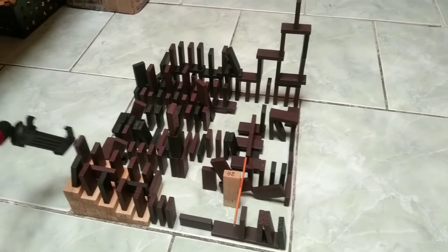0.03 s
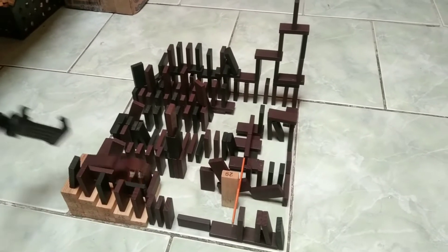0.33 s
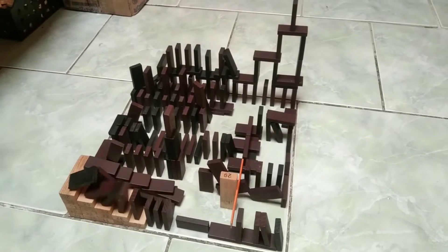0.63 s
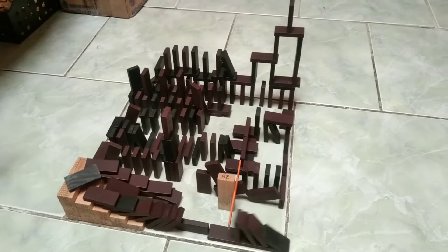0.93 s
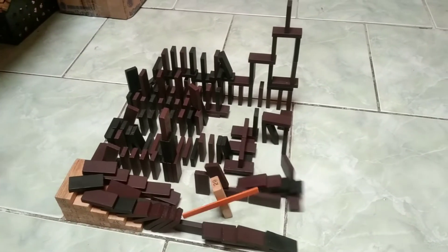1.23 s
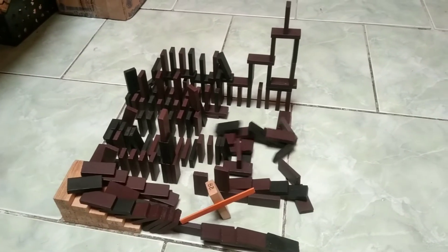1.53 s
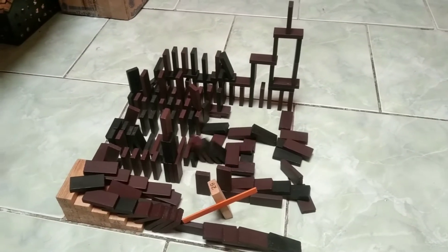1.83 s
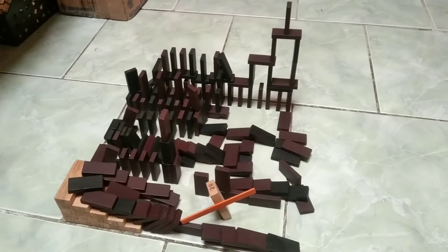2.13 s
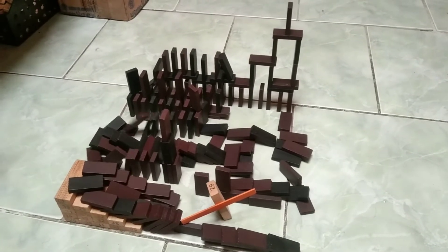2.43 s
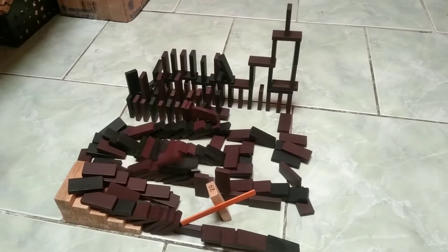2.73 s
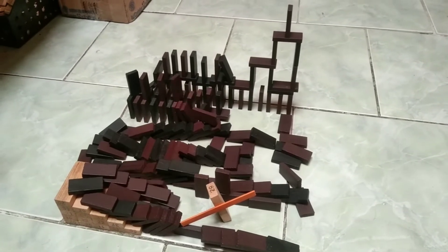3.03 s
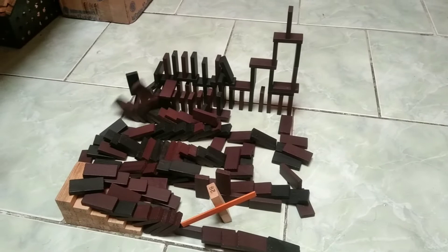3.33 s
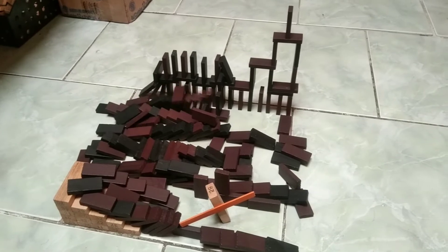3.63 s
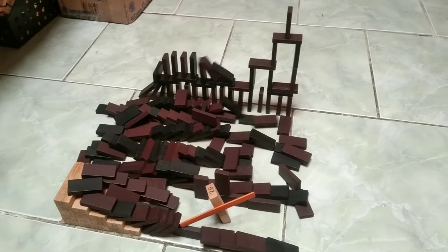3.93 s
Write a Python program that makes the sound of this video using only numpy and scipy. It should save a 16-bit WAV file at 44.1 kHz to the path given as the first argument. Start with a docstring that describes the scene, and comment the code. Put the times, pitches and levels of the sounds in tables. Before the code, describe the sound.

Small hard dominoes fall against one another in irregular clattering bursts, set off by a softly sliding toy. They rattle, clink and knock on wood and tile, pause briefly, then carry on in a slightly echoing room.

```python
"""Dominoes toppling on tile

A toy scrapes up to small, hard dominoes, and they fall in uneven runs. Each collision cracks, rings
briefly on a low and a high note, then chatters as the block settles. Some blocks slap, clink, rattle
or knock on wooden props. It all echoes in a bare room with a faint hum."""
import sys
import numpy as np
from scipy import signal
from scipy.fft import rfft, irfft
from scipy.io import wavfile
from scipy.ndimage import uniform_filter1d, minimum_filter1d

SR = 44100
rng = np.random.default_rng(int(sys.argv[2]) if len(sys.argv) > 2 else 0)


def put_to_file(sound):
    """Save the sound as 16-bit audio at rate SR, in the file named by the first command-line argument."""
    columns = np.atleast_2d(sound).T  # one column per channel
    safe = np.clip(columns, -1, 1)
    whole_steps = np.round(safe * 32767)
    wavfile.write(sys.argv[1], SR, whole_steps.astype(np.int16))


N = 176400

# how loud the sliding toy is: time_s, level_db
SLIDE_LEVELS = [(0, -65), (.05, -66), (.1, -58), (.2, -50), (.42, -55), (.6, -85)]
# tone colour (how strong each frequency is) of the toy's scrape: frequency_hz, level_db
SLIDE_COLOUR = [(500, -42), (2400, -19.5), (4300, -9), (7000, -18.5), (10000, -29), (13000, -42)]
# tone colour of the room's own noise: frequency_hz, level_db
AIR_COLOUR = [(20, -31.5), (55, -8), (95, -0.5), (150, -5.5), (290, -12.5), (440, -9.5), (700, -19.5),
              (8000, -22), (15000, -63.5)]
# one block hits the next: start_s, low_pitch_hz, low_level_db, high_pitch_hz, high_level_db
COLLISIONS = [(0.312, 5030, -41, 6570, -41), (0.4174, 4060, -32.5, 6540, -36),
              (0.4658, 4660, -26, 6630, -26), (0.4963, 2840, -27, 6400, -26.5),
              (0.5277, 4840, -28.5, 6960, -38), (0.5583, 3470, -21.5, 8250, -22),
              (0.568, 3800, -16.5, 8350, -16), (0.5925, 5040, -14, 8690, -6),
              (0.6051, 3560, -18, 8400, -14), (0.6407, 3460, -22, 8550, -10),
              (0.7119, 4020, -22, 7400, -24.5), (0.759, 4750, -37, 7400, -32),
              (0.8097, 3950, -30, 7680, -29), (0.8508, 4780, -26.5, 6530, -25.5),
              (0.8599, 5140, -23, 6540, -19.5), (0.8991, 3270, -23.5, 7460, -14.5),
              (1.0202, 3700, -31.5, 7540, -57), (1.0578, 4540, -35, 6500, -34),
              (1.11, 3750, -31, 8360, -28), (1.169, 4220, -34.5, 8050, -32.5),
              (1.204, 3660, -24.5, 8160, -31.5), (1.241, 3070, -32, 8100, -31.5),
              (1.2727, 4560, -21, 7850, -20), (1.3389, 3680, -25.5, 7770, -28.5),
              (1.3646, 4660, -23, 8840, -17), (1.379, 3720, -25, 8750, -12.5),
              (1.393, 3880, -26.5, 8570, -13), (1.4385, 4540, -23.5, 8860, -23),
              (1.5087, 3360, -29, 7590, -30.5), (1.622, 4150, -37, 7640, -33.5),
              (1.6461, 5500, -23, 8530, -19), (1.69, 4660, -24, 6170, -26),
              (1.7522, 5300, -24.5, 6420, -35), (1.794, 3880, -24.5, 7600, -33),
              (1.8352, 4800, -26, 7460, -24.5), (1.8583, 4930, -18.5, 7800, -12.5),
              (1.879, 4070, -22.5, 7600, -16.5), (1.9248, 5130, -21.5, 8500, -12.5),
              (1.9789, 4970, -33, 8490, -19), (2.0204, 4100, -23.5, 6650, -24),
              (2.0415, 4300, -18.5, 6980, -16.5), (2.057, 4430, -19.5, 7340, -20.5),
              (2.112, 3920, -23, 7550, -35), (2.187, 3880, -28.5, 7700, -33.5),
              (2.3256, 4250, -67, 7680, -42.5), (2.4598, 4300, -35, 7300, -45),
              (2.478, 5100, -30.5, 7120, -38), (2.487, 4500, -29.5, 7070, -32.5),
              (2.5118, 4540, -27.5, 7300, -28.5), (2.621, 5020, -31, 7920, -26),
              (2.7409, 4860, -26, 8920, -20), (2.852, 2840, -30, 7550, -35), (2.8717, 4700, -19, 7900, -13),
              (2.8868, 4670, -13.5, 7400, -7), (2.9053, 4600, -22, 6980, -12.5),
              (2.9523, 4100, -19.5, 7580, -17), (2.958, 4600, -18, 7600, -18.5),
              (3.0051, 4560, -22, 7300, -27), (3.0158, 4340, -18.5, 7380, -13.5),
              (3.066, 3340, -29, 7210, -16.5), (3.1108, 4200, -22.5, 7350, -80),
              (3.12, 4280, -20, 7400, -23), (3.2637, 4350, -24.5, 8950, -37.5),
              (3.3332, 4800, -36, 7400, -32), (3.364, 4050, -20, 7400, -22),
              (3.41, 4230, -31.5, 6940, -20.5), (3.4835, 4220, -16.5, 7760, -6),
              (3.5022, 4939, -16, 7550, -8), (3.5486, 5540, -18, 7100, -14),
              (3.5589, 3820, -19.5, 8200, -14), (3.5959, 4000, -19.5, 7800, -20),
              (3.6357, 4100, -16.5, 7500, -19.5), (3.6901, 4350, -22.5, 7700, -36),
              (3.742, 4343, -30, 7540, -20.5), (3.7673, 4670, -26, 7960, -20),
              (3.7916, 4000, -33, 7880, -16), (3.8468, 4070, -21, 7740, -21),
              (3.9145, 5000, -17.5, 7310, -15.5), (3.9864, 3770, -25, 8000, -20.5)]
# tone colour of a crack's low part: frequency_hz, level_db
LOW_COLOUR = [(200, -61), (1000, -23.5), (2100, -11.5), (2950, 0.5), (4200, 3), (5600, -0.5), (6600, -6.5),
              (9000, -36)]
# tone colour of its high part: frequency_hz, level_db
HIGH_COLOUR = [(3500, -36), (5400, -5), (6300, 0.5), (8400, 2), (10000, -13.5), (12500, -31)]
# tone colour of the thin tick on top: frequency_hz, level_db
TICK_COLOUR = [(8000, -39), (10500, 4), (16000, -10)]
# how loud that tick is next to the high part: time_s, level_db
TICK_LEVELS = [(.55, -26), (1.15, -24), (1.6, -16.5), (2.2, -32), (2.55, -26.5), (3.05, -23), (3.4, -19),
               (4, -23)]
# tone colour of blocks rubbing on tile: frequency_hz, level_db
SCRUB_COLOUR = [(250, -13.5), (1300, 0), (6000, -15)]
# blocks slapping face to face: start_s, level_db
SLAPS = [(.5675, -16), (.577, -18.5), (0.6302, -30), (1.273, -21.5), (1.393, -22), (1.9235, -18),
         (1.979, -18.5), (2.905, -15), (3.0137, -19), (3.119, -25), (3.549, -18), (3.595, -18)]
# knocks on the props and floor: start_s, pitch_hz, level_db
KNOCKS = [(.593, 1520, -33), (.759, 1250, -39), (.901, 1720, -35.5), (1.204, 2308, -37.5),
          (1.242, 2470, -30), (1.273, 960, -46), (1.692, 138, -47.5), (2.885, 1460, -37), (2.887, 480, -50),
          (3.365, 1860, -33.5)]
# blocks bouncing clear: start_s, pitch_hz, level_db
CLINKS = [(.863, 6620, -15.5), (1.379, 3510, -19), (2.112, 7740, -19.5), (2.741, 9200, -26),
          (2.953, 2930, -19), (3.519, 6987, -21)]
# rows of blocks sliding down: start_s, end_s, low_level_db, high_level_db
RATTLES = [(1.549, 1.58, -34, -37.5), (1.86, 1.998, -39.5, -26.5), (2.018, 2.158, -30, -41),
           (2.634, 2.715, -34.5, -31), (3.458, 3.479, -22, -33), (3.522, 3.829, -28.5, -36.5)]
# how long the room's echo takes to fade by 60 dB: frequency_hz, fade_s
ECHO_FADES = [(300, 0.2), (1500, 0.75), (4000, 0.51), (8000, 0.32), (14000, 0.42)]

BLOW_S = 0.0033  # a blow has the energy of a steady sound at its level lasting this long
TOUCH_DETUNE = 0.11  # slaps and rattles stray in pitch by about this share


def amp(db):
    """Turns decibels into a number to multiply by."""
    return 10 ** (np.asarray(db) / 20)


def unit(x):
    """Scales a sound so its energy is 1."""
    return x / np.sqrt(np.sum(x ** 2) + 1e-20)


def read(points, hz):
    """Looks up frequencies in a table, giving each octave equal space."""
    f, value = np.transpose(points)
    return np.interp(np.log(hz + 1), np.log(np.maximum(f, 1)), value)


def add(mix, start_s, sound):
    """Adds a sound to the mix at the given time."""
    part = mix[max(round(start_s * SR), 0):][:len(sound)]
    part += sound[:len(part)]


def noise(colour):
    """Steady noise with the given tone colour and an average power of 1."""
    hz = np.fft.rfftfreq(N, 1 / SR)
    phases = np.exp(2j * np.pi * rng.random(len(hz)))
    return unit(irfft(amp(read(colour, hz)) * phases, N)) * np.sqrt(N)


def toy_slide():
    """The toy scrapes softly as it is pushed up to the first block."""
    level_db = np.interp(np.arange(N) / SR, *np.transpose(SLIDE_LEVELS))
    return noise(SLIDE_COLOUR) * amp(level_db)


def background(air_db=-56, waver_db=1.5, hum_hz=115.5, hum_db=-63):
    """Low room noise that wavers in patches, and a faint hum."""
    spectrum = signal.stft(noise(AIR_COLOUR), nperseg=2048)[2]
    patches = uniform_filter1d(rng.standard_normal(spectrum.shape), size=5, axis=0)
    patches = uniform_filter1d(patches, size=10, axis=1)
    air = signal.istft(spectrum * amp(waver_db * patches / patches.std()))[1][:N]
    hum = np.sqrt(2) * np.sin(2 * np.pi * hum_hz * np.arange(N) / SR)
    return amp(air_db) * air / air.std() + amp(hum_db) * hum


def strike(colour, hz, rise_s, ring_s=0.0027, ring_db=1.5, size=1536):
    """Part of a blow: a sharp crack, a louder noisy body that outlasts it, and each block's main note."""
    crack_s, body_s, body_db = 0.00029, 0.0028, 9  # like ring_s, times to fade to about a third
    max_detune = 0.042  # one block rings a little flat, the other a little sharp
    t = np.maximum(np.arange(size) - 12, 0) / SR
    rise = 1 - np.exp(-(t / rise_s) ** 2)
    fade = np.exp(-t / crack_s) + amp(body_db) * np.exp(-t / body_s)
    burst = rng.standard_normal(size) * rise * fade
    crack = unit(irfft(rfft(burst) * amp(read(colour, np.fft.rfftfreq(size, 1 / SR)))))
    pair = np.zeros(size)
    for side in (-1, 1):
        block_hz = hz * (1 + side * max_detune * rng.random())
        pair += np.sin(2 * np.pi * (block_hz * t + rng.random()))
    ring = unit(pair * rise * np.exp(-t / ring_s))
    return unit(crack + amp(ring_db) * ring) * np.sqrt(BLOW_S * SR)


def clack(start_s, low_hz, low_db, high_hz, high_db, typical_hz=4280, tick_hz=(10430, 14700)):
    """Two blocks meet: a low and a high ring, with a thin tick on top."""
    shift = (low_hz / typical_hz) ** 0.31  # the low crack's colour follows the low note
    low_colour = [(hz * shift, db) for hz, db in LOW_COLOUR]
    rise_s = 0.00015 * amp(-0.39 * max(low_db, high_db))  # weaker blows stay in contact longer
    low = strike(low_colour, low_hz, rise_s, ring_s=0.00051, ring_db=-2)
    high = strike(HIGH_COLOUR, high_hz, rise_s)
    tick = strike(TICK_COLOUR, rng.uniform(*tick_hz), rise_s)
    tick_db = np.interp(start_s, *np.transpose(TICK_LEVELS))
    return amp(low_db) * low + amp(high_db) * (high + amp(tick_db) * tick)


def dominoes(corner_s=0.004, corner_db=-8, bounces=4, chatter_s=0.04, chatter_db=-15.5, spread_db=2.5):
    """Each block hits, lands its second corner just after, then chatters in weaker bounces."""
    out = np.zeros(N)
    for start_s, low_hz, low_db, high_hz, high_db in COLLISIONS:
        blow = (start_s, low_hz, low_db, high_hz, high_db)
        add(out, start_s, clack(*blow))
        add(out, start_s + corner_s * (.5 + rng.random()), amp(corner_db) * clack(*blow))
        for _ in range(bounces):
            low_stray, high_stray, force = rng.standard_normal(3)
            bounce = clack(start_s, low_hz * (1 + 0.145 * low_stray), low_db,
                           high_hz * (1 + 0.0725 * high_stray), high_db)
            gain = amp(chatter_db + spread_db * np.tanh(force))
            add(out, start_s + chatter_s * rng.random(), gain * bounce)
    return out


def scrub(start_s=0.41, end_s=1.7, level_db=-52.5):
    """The nearest blocks rub dully on the tile as they fall."""
    t = np.arange(N) / SR
    moving = 1. * (t > start_s) * (t < end_s)
    return amp(level_db) * noise(SCRUB_COLOUR) * uniform_filter1d(moving, SR // 10)


def slaps(pitch_hz=5820, peak_s=0.000165):
    """Blocks meet flat, making a few vibrations that die at once."""
    out, t = np.zeros(N), np.arange(256) / SR
    for start_s, db in SLAPS:
        hz = pitch_hz * (1 + TOUCH_DETUNE * rng.standard_normal())
        slap = np.sin(2 * np.pi * hz * t) * t * np.exp(-t / peak_s)
        add(out, start_s, amp(db) * unit(slap) * np.sqrt(BLOW_S * SR))
    return out


def taps(rows, ring_s, width, size=4096):
    """Short bursts of noise, each around one pitch; width is a share of that pitch."""
    out, t = np.zeros(N), np.arange(size) / SR
    f = np.fft.rfftfreq(size, 1 / SR)
    for start_s, hz, db in rows:
        resonance = 1 / (1 + (2 * (f / hz - 1) / width) ** 2)
        ring = irfft(resonance * np.exp(2j * np.pi * rng.random(len(f))))
        burst = ring * (1 - np.exp(-t * hz)) * np.exp(-t / (ring_s + .5 / hz))  # low notes last longer
        add(out, start_s, amp(db) * unit(burst) * np.sqrt((BLOW_S + 2 / hz) * SR))
    return out


def knocks():
    """Dull, dry hits on the wooden props and the floor."""
    return taps(KNOCKS, ring_s=0.005, width=0.6)


def clinks():
    """Blocks bounce clear and ring on one note."""
    return taps(CLINKS, ring_s=0.0055, width=0.045)


def rattles(gap_s=0.010, pitches_hz=(3900, 7675), spread_db=6.5):
    """Blocks slide down on each other in quick, uneven touches, each at its own pitch."""
    out = np.zeros(N)
    for start_s, end_s, low_db, high_db in RATTLES:
        for touch_s in np.arange(start_s, end_s, gap_s):
            low_hz, high_hz = np.array(pitches_hz) * (1 + TOUCH_DETUNE * rng.standard_normal(2))
            force_db = spread_db * rng.uniform(-1.4, 1)
            late_s = gap_s * rng.random()
            touch = clack(touch_s, low_hz, low_db + force_db, high_hz, high_db + force_db)
            add(out, touch_s + late_s, touch)
    return out


def room(sound, floor_db=-8, walls_db=-4.5, walls_fade_s=0.073, tail_db=-6.5):
    """Sound scatters off tile and blocks, bounces off the walls, then rings on, longest in the mids."""
    t = np.arange(SR * 2 // 3) / SR
    floor_noise, wall_noise, tail_noise, pick = rng.standard_normal((4, len(t)))
    floor = unit(floor_noise * (t > .001) * (t < .0081))
    wall_echoes = wall_noise * (pick > 1) * (t > .0095)
    walls = unit(wall_echoes * np.exp(-np.log(1000) * t / walls_fade_s))
    hz, age_s, spectrum = signal.stft(tail_noise, SR, nperseg=256)
    fade = np.exp(-np.log(1000) * age_s / read(ECHO_FADES, hz)[:, None])
    tail = unit(signal.istft(spectrum * fade)[1][:len(t)] * (t > .0083))
    echo = amp(floor_db) * floor + amp(walls_db) * walls + amp(tail_db) * tail
    return signal.fftconvolve(sound, echo)[:N]


def scene(patterns=4, cycle_hz=2):
    """Mixes it all; the hits cycle through echo patterns so the echo does not ring on fixed pitches."""
    hits = dominoes() + rattles() + slaps() + clinks() + knocks()
    turns = cycle_hz * np.arange(N) / SR
    echoes = np.zeros(N)
    for k in range(patterns):
        share = np.maximum(np.cos(2 * np.pi * (turns + k / patterns)), 0)
        echoes += room(hits * share)
    return (hits + echoes + toy_slide() + scrub() + background())[None]


def record(dry, ceiling=1.1, window=16, cutoff_hz=15900):
    """Turns the loudest cracks down for an instant, then removes the highest treble."""
    gain = ceiling / np.maximum(abs(dry), ceiling)
    limited = dry * uniform_filter1d(minimum_filter1d(gain, window), window)
    lowpass = signal.firwin(255, cutoff_hz, window=("kaiser", 7), fs=SR)
    return signal.oaconvolve(limited, lowpass[None], "same")


dry = scene()
out = record(dry)
put_to_file(out)
```